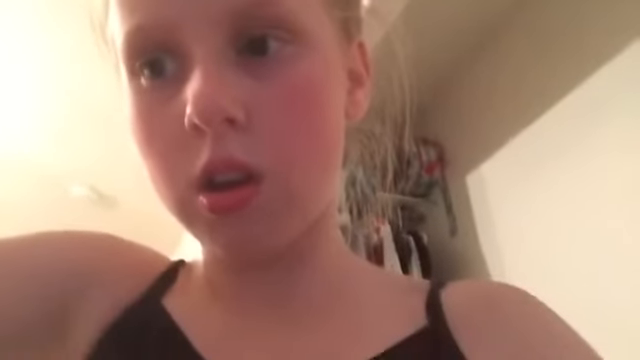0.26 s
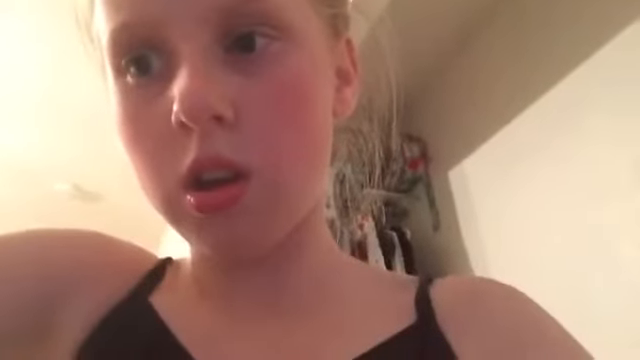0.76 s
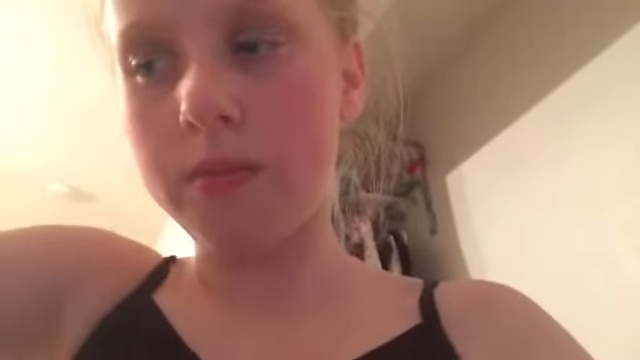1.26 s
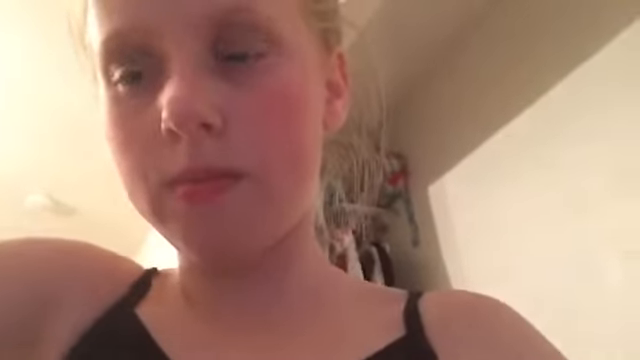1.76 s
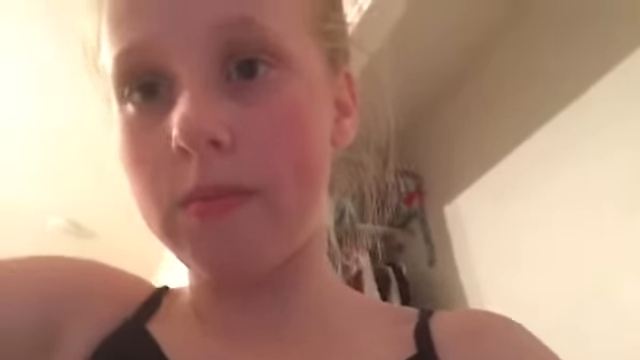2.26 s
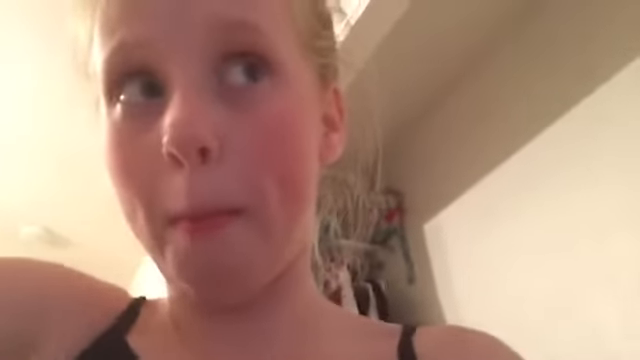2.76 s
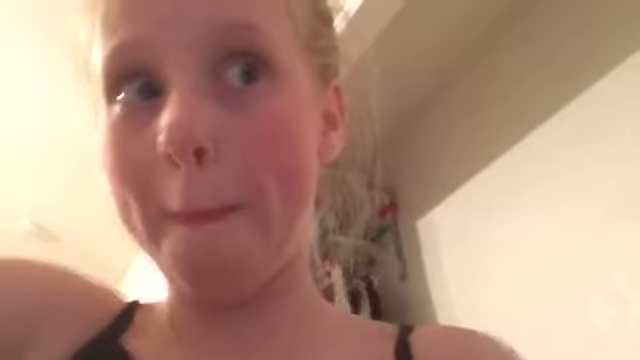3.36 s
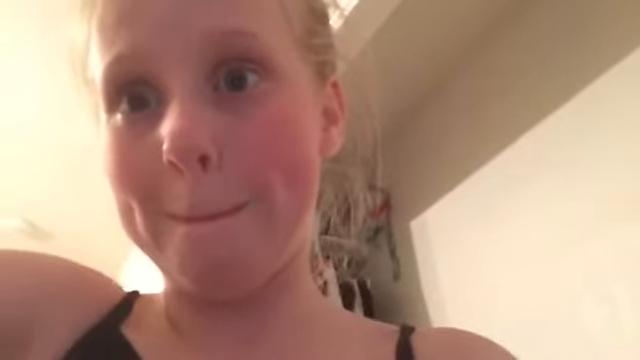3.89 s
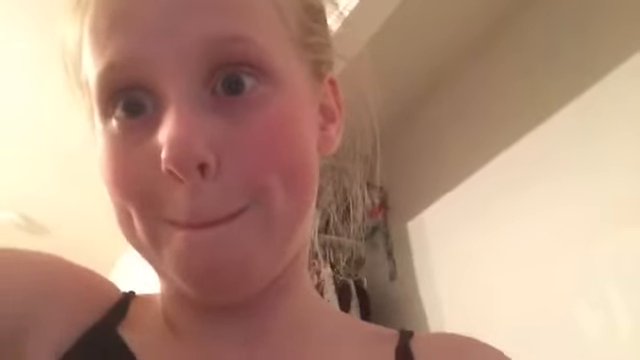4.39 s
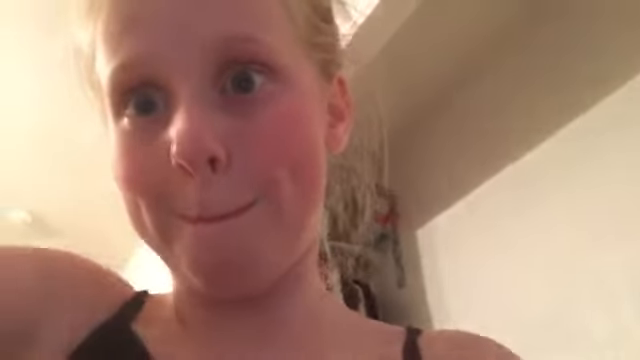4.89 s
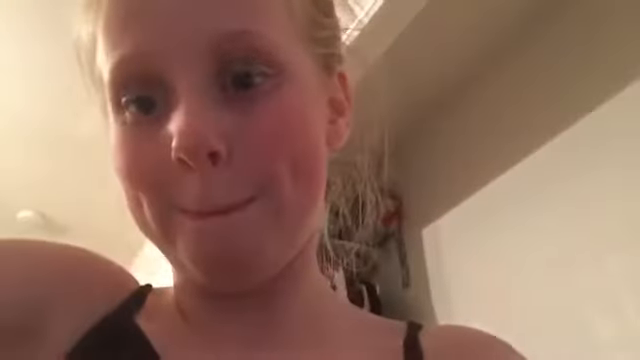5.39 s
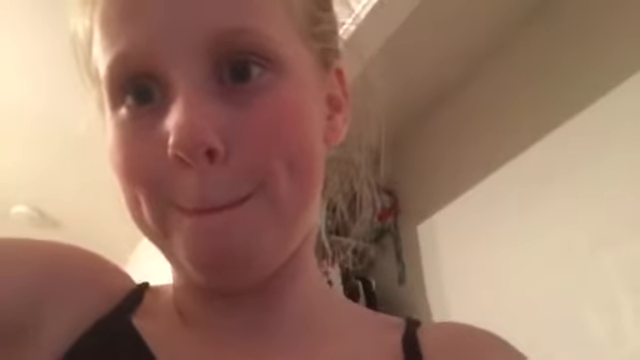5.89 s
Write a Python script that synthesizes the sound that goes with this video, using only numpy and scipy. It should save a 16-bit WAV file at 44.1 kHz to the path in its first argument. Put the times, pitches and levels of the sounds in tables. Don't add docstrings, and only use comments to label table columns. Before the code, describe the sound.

Fingertips drum loosely on an upturned small ceramic bowl, then settle into steady hollow taps with nail ticks and faint skin scrapes, very close.

```python
import sys
import numpy as np
from scipy import signal
from scipy.fft import rfft, irfft
from scipy.io import wavfile
from scipy.ndimage import uniform_filter1d

SR = 44100
rng = np.random.default_rng(int(sys.argv[2]) if len(sys.argv) > 2 else 0)


def invert_db(level):
    return 10 ** (np.asarray(level, dtype=float) / 20)


def int16_out(signal):
    q = np.round(np.clip(np.atleast_2d(signal).T, -1, 1) * 32767)
    wavfile.write(sys.argv[1], SR, q.astype(np.int16))


N = 270774
T = np.arange(N) / SR

# (frequency [Hz], level [dB], T60 [s])
BOWL_MODES = [(146, -14, 0.3), (214.4, -24.5, 0.028), (256.4, 13.5, 0.076), (363, 2, 0.027),
              (486.3, 8, 0.094), (498, -1, 0.071), (604, -0.5, 0.013), (746, -3.5, 0.092),
              (755, -25.5, 0.066)]
# (frequency [Hz], level [dB], T60 [s])
GLAZE_MODES = [(1588, -17, 0.066), (2440, 9, 0.02), (3040, -4, 0.075), (3132, 13, 0.047),
               (3402, 26.5, 0.014), (4123, 15, 0.044), (4530, -2.5, 0.06), (5200, 1, 0.045),
               (5740, -19, .015)]
# (frequency [Hz], density [dB per Hz])
SCRATCH_COLOUR = [(530, -33), (900, -15.5), (967, -44.5), (1160, -6), (1620, -3.5), (1960, -6), (2840, 1.5),
                  (3480, 2.5), (6330, -8.5), (7310, -17.5), (15700, -53)]
# (frequency [Hz], density [dB per Hz])
TICK_COLOUR = [(530, -25), (900, -19.5), (1100, -19.5), (3130, -5.5), (4120, -10), (5110, -8.5),
               (5820, -15), (6410, -12), (7140, -20.5), (8050, -21.5), (15700, -38.5)]
# (frequency [Hz], density [dB per Hz])
HUM_COLOUR = [(15, -69.5), (25, -47), (65, -37), (119, -6), (242, 0.5), (339, -4), (402, -15), (469, -5),
              (806, -14), (1000, -23), (1300, -65), (2200, -120)]
# (lag [s], level [dB])
NEAR_ECHOES = [(.0065, -9.5), (.0088, -15)]
# (frequency [Hz], density [dB per Hz])
HISS_COLOUR = [(200, -28.5), (600, -2), (1000, -13), (1600, -11.5), (3000, 0.5), (6000, -8), (9000, -8),
               (15500, -13.5)]
# (frequency [Hz], level [dB])
THUD_COLOUR = [(30, -37), (110, -0.5), (200, 6), (300, 3), (840, 7.5), (960, -13), (2000, -34.5),
               (16000, -59)]
# (time [s], thud peak [dB], tick [dB], rebound [dB])
ROLLS = [(.002, -36.5, -39.5, -1.5), (.142, -21, -35.5, -5.5), (.24, -35, -45, -0.5),
         (0.3426, -31, -31.5, -3), (0.3537, -39.5, -41.5, -8.5), (.406, -38, -48.5, 1.5),
         (.422, -42, -44.5, 0), (0.5553, -34.5, -43.5, -2), (.568, -33, -46, -7.5), (.577, -30.5, -55, -5),
         (0.591, -29, -57.5, -13.5), (.652, -39.5, -44.5, -10.5), (0.75, -41.5, -50.5, 10),
         (0.763, -32, -53, -17), (.778, -30.5, -54, -15.5), (.793, -35, -51, -10.5), (.844, -34, -48, -1.1),
         (0.988, -35.5, -47, 6), (1, -30, -54.5, 10.5), (1.013, -34, -55.5, 11.5),
         (1.274, -48.5, -51.5, -6)]
# (time [s], thud peak [dB], tick [dB], thud pitch [Hz])
BEATS = [(1.456, -27.5, -38.5, 377), (1.66, -33, -44.5, 364), (1.83, -30.5, -41, 397),
         (1.959, -42.5, -62, 357), (1.976, -39, -50.5, 360), (2.158, -33.5, -47.5, 330),
         (2.346, -30.5, -41.5, 363), (2.518, -26, -42.5, 397), (2.689, -31.5, -41.5, 382),
         (2.847, -35, -40.5, 335), (3.035, -30, -40.5, 386), (3.212, -30.5, -41, 415),
         (3.377, -31.5, -42.5, 394), (3.542, -29.5, -42, 410), (3.547, -32, -51, 420),
         (3.714, -27.5, -40.5, 373), (4.012, -32, -46, 376), (4.19, -35.5, -48, 367),
         (4.349, -34.5, -45, 346), (4.541, -28.5, -47.5, 350), (4.698, -35.5, -50.5, 343),
         (4.883, -34.5, -47, 348), (5.186, -35.5, -49.5, 359), (5.373, -29.5, -42.5, 359),
         (5.555, -26.5, -39, 362), (5.739, -27, -38.5, 400), (5.912, -29.5, -40, 368)]
# (start [s], length [s], scratch [dB], rumble [dB])
SCRAPES = [(0, 0.036, -46, -46), (0.067, 0.074, -61, -55), (0.239, 0.012, -50.5, -52),
           (.319, 0.024, -55.5, -61.5), (.348, 0.066, -65, -54.5), (.418, .03, -48.5, -49.5),
           (0.556, 0.049, -41.5, -49.5), (0.618, 0.066, -48, -53.5), (0.709, 0.04, -50, -54),
           (0.752, 0.048, -40, -51), (0.839, 0.042, -49.5, -49.5), (0.918, 0.058, -57.5, -55),
           (.982, .044, -40.5, -57), (1.054, 0.022, -56, -54.5), (1.132, 0.036, -63.5, -62.5),
           (1.297, 0.043, -58, -65), (1.878, .025, -52, -56.5), (1.954, 0.033, -62, -45),
           (2.545, 0.091, -66, -77), (2.745, 0.057, -59.5, -65), (3.036, 0.058, -52.5, -58),
           (3.618, 0.099, -70.5, -75.5), (4.333, 0.11, -64.5, -57.5), (4.778, 0.07, -64, -66.5),
           (4.892, 0.082, -64, -75), (5.101, 0.051, -74.5, -71), (5.237, 0.024, -66, -67.5),
           (5.451, 0.056, -67, -72.5), (5.784, 0.03, -66.5, -74), (6.122, 0.051, -67, -66)]
# (start [s], length [s], hollow [dB], rumble [dB])
SHIFTS = [(0, 0.076, -64, -64), (0.05, 0.11, -65, -71), (0.122, 0.17, -62.5, -57),
          (0.238, 0.012, -46.5, -71), (0.33, 0.053, -64, -74.5), (0.406, 0.026, -59, -74.5),
          (0.469, 0.0099, -65, -85), (.751, 0.088, -57.5, -64), (1.133, 0.036, -63.5, -80),
          (1.235, 0.035, -63.5, -69), (1.268, 0.03, -55, -76), (1.731, 0.024, -76, -86),
          (1.943, 0.074, -68, -78), (2.032, 0.045, -67.5, -71), (2.453, 0.2, -64, -81),
          (2.839, 0.08, -71.5, -55.5), (2.947, 0.019, -72.5, -68.5), (3.044, 0.081, -59.5, -71),
          (3.106, 0.22, -69.5, -92), (3.626, 0.056, -71.5, -76), (3.899, 0.025, -73, -66),
          (3.973, 0.034, -73.5, -72.5), (4.04, 0.058, -61, -60), (4.221, 0.049, -75.5, -67),
          (4.72, 0.029, -77, -71)]
# (start [s], length [s], fizz [dB])
BRUSHES = [
    (0.336, 0.019, -66),
    (1.274, 0.065, -75),
    (2.749, .05, -78.5),
    (3.036, 0.085, -65),
    (4.348, .09, -88),
    (4.89, 0.084, -77),
    (5.598, 0.072, -80),
    (5.742, 0.044, -71.5),
    (5.546, 0.036, -68.5),
    (5.918, .05, -78.5),
]

ROOM_T60_LOW_S, ROOM_T60_HIGH_S, ROOM_LOW_DB, ROOM_HIGH_DB = 0.24, 0.33, -13, -12.5
WALL_S = 0.009
REBOUND_S, PAD_S, CRACK_S = 0.0118, 0.0047, 0.0035
ROLL_HZ, USUAL_THUD_DB, USUAL_TICK_DB = 407, -28.5, -47
REBOUND_DB, REBOUND_PER_DB = -4, -0.38
TILT_DB, TILT_PER_DB = -2, 0.25
SCRAPE_FIZZ_DB, SCRAPE_HOLLOW_DB = -23, -27
LIFT_LAG_S, LIFT_S, LIFT_SCRATCH_DB, LIFT_FIZZ_DB = 0.0048, 0.09, -31.5, -41
HUM_DB, HUM_PER_DB, HUM_FOLLOW_S, HUM_MIDDLE_DB = -75.5, 0.7369, 0.076, -53.5
JOLT_HZ, JOLT_DB, JOLT_S = 40.5, -46.5, 0.012
HISS_DB, GATE_OVER_DB, GATE_DEPTH_DB = -68, 3, -24.5


def unit(x):
    return x / np.sqrt(np.mean(x ** 2))


def unit_energy(x):
    return x / np.linalg.norm(x)


def colour(x, points):
    hz, db = np.transpose(points)
    f = np.maximum(np.arange(len(x) // 2 + 1) * SR / len(x), 1)
    return irfft(rfft(x) * invert_db(np.interp(np.log(f), np.log(hz), db)), len(x))


def coloured_noise(points):
    return unit(colour(rng.standard_normal(N), points))


def resonate(x, response):
    return signal.fftconvolve(x, response)[:N]


def ring(modes, t, weight=1, stretch=1):
    hz, db, t60 = np.transpose(modes)[:, :, None]
    fading = weight * invert_db(db - 60 * t / t60)
    return (fading * np.sin(2 * np.pi * hz * stretch * t)).sum(axis=0)


def add(out, s, x):
    i = int(s * SR)
    out[i:i + len(x)] += x[:N - i]


def blows():
    every = [(s, db, tick_db, ROLL_HZ, rebound_db) for s, db, tick_db, rebound_db in ROLLS]
    for s, db, tick_db, hz in BEATS:
        rebound_db = REBOUND_DB + REBOUND_PER_DB * (tick_db - USUAL_TICK_DB)
        every.append((s, db, tick_db, hz, rebound_db))
    return every


def swell(layer_dbs, s, length):
    samples = max(length, 0.01) * SR
    u = np.arange(int(samples)) / samples
    for layer, db in layer_dbs:
        add(layer, s, invert_db(db) * np.minimum(u / 0.22, 1) * np.minimum((1 - u) / 0.41, 1))


def contact():
    scratch, rumble, hollow, fizz = layers = np.zeros((4, N))
    for s, length, db, rumble_db in SCRAPES:
        swell([(scratch, db), (rumble, rumble_db), (hollow, db + SCRAPE_HOLLOW_DB),
               (fizz, db + SCRAPE_FIZZ_DB)], s, length)
    for s, length, db, rumble_db in SHIFTS:
        swell([(hollow, db), (rumble, rumble_db)], s, length)
    for s, length, db in BRUSHES:
        swell([(fizz, db)], s, length)
    for s, _, tick_db, *_ in blows():
        swell([(scratch, tick_db + LIFT_SCRATCH_DB), (fizz, tick_db + LIFT_FIZZ_DB)], s + LIFT_LAG_S, LIFT_S)
    return layers


def drags():
    scratch, rumble, hollow, fizz = contact()
    uneven_db = np.minimum(3.0 * rng.exponential(size=(3, N // 64 + 1)), 9)
    slips = rng.standard_normal((3, N)) * invert_db(uneven_db).repeat(64, axis=1)[:, :N]
    t = T[:SR // 8]
    glaze = unit_energy(ring(GLAZE_MODES, t))
    bowl = unit_energy(ring(BOWL_MODES, t))
    hand = unit_energy(ring([(1599, -1, 0.029), (1325, -8.5, 0.029), (1850, -11.0, 0.02)], t))
    bright = unit(colour(slips[0], SCRATCH_COLOUR)) * scratch
    bright += unit(colour(slips[1], [(4000, -28.5), (7500, -3.0), (11000, -9), (15500, -14)])) * fizz
    bright += 0.3 * resonate(unit(slips[0]) * scratch, glaze)
    bright += resonate(unit(slips[2]) * hollow, hand)
    dull = resonate(unit(slips[1]) * rumble, bowl)
    return colour(dull, [(100, -18), (280, 1.0)]), bright


def air(near):
    t = T[:SR // 2]
    memory = np.exp(-t / HUM_FOLLOW_S) / (HUM_FOLLOW_S * SR)
    near_db = 10 * np.log10(np.maximum(resonate(near ** 2, memory), 1e-10))
    hum = coloured_noise(HUM_COLOUR) * invert_db(HUM_DB + HUM_PER_DB * (near_db - HUM_MIDDLE_DB))
    drone = coloured_noise([(25, -22.0), (90, -18.5), (135, 7.5), (220, -3.0), (400, -44.5)])
    return hum + invert_db(-76) * drone


def taps():
    thuds, ticks, t = np.zeros(N), np.zeros(N), T[:SR // 6]
    grit = coloured_noise(TICK_COLOUR)
    modes = len(BOWL_MODES)
    chance = rng.standard_normal((len(blows()), modes + len(GLAZE_MODES) + 1))
    push = np.exp(-((t - PAD_S) / np.where(t < PAD_S, 0.0015, 0.0024)) ** 2)
    crack_shape = np.exp(-t / CRACK_S) + invert_db(-13.0) * np.exp(-t / 0.019)
    crack_shape *= np.minimum(t / 0.0024, 1)
    for (s, db, tick_db, hz, rebound_db), c in zip(blows(), chance):
        knock = -np.cos(2 * np.pi * hz * (t - PAD_S)) * push
        rim = ring([(801, -21.5, 0.045), (613, -20.5, 0.059)], t, invert_db(2.5 * c[3:5, None]), 1 + 0.012 * c[5])
        rim *= np.clip(t / 0.003, 0, 1)
        body = ring(BOWL_MODES, t, c[:modes, None], 1 + 0.045 * c[-1])
        body *= np.clip(t / 0.012, 0, 1) ** 2
        add(thuds, s, invert_db(db) * (knock + rim + invert_db(-19.5) * body))
        for lag_s, echo_db in NEAR_ECHOES:
            add(thuds, s + lag_s + 0.00038 * c[1], invert_db(db + echo_db + 0.47 * c[2]) * knock)

        crack = grit[int(s * SR) // 2:][:len(t)] * crack_shape
        tick = crack + 0.045 * ring(GLAZE_MODES, t, c[modes:-1, None], 1 + 0.0079 * c[-1])
        tilt_db = TILT_DB + TILT_PER_DB * (db - USUAL_THUD_DB)
        tick = colour(tick, [(750, -2 * tilt_db), (3000, 0.025), (12000, 2 * tilt_db)])
        tick *= (1 - t / t[-1]) ** 2
        add(ticks, s + 0.0007, invert_db(tick_db + 4.5) * tick)
        add(ticks, s + REBOUND_S + 0.00037 * c[0], invert_db(tick_db - 0.5 + rebound_db) * tick)
    return thuds, ticks


def jolts():
    out, t = np.zeros(N), T[:SR // 8]
    swing = np.sin(2 * np.pi * JOLT_HZ * t) * (t / JOLT_S) * np.exp(1 - t / JOLT_S)
    for s, db, *_ in blows():
        add(out, s, invert_db(db + JOLT_DB + 1.5 * rng.standard_normal()) * swing)
    return out


def room(x, t60, db):
    t = T[:SR // 2]
    tail = rng.standard_normal(len(t)) * invert_db(-60 * t / t60) * np.clip((t - WALL_S) / 0.004, 0, 1)
    return x + invert_db(db) * resonate(x, unit_energy(tail))


def gate(x, hiss):
    frame = dict(fs=SR, nperseg=2048, noverlap=1536)
    z = signal.stft(x + hiss, **frame)[2]
    usual = np.mean(np.abs(signal.stft(hiss, **frame)[2]) ** 2, axis=-1, keepdims=True)
    power = uniform_filter1d(np.abs(z) ** 2, size=19, axis=-2)
    gain = np.clip(1 - invert_db(2 * GATE_OVER_DB) * usual / (power + 1e-18), invert_db(GATE_DEPTH_DB), 1)
    return signal.istft(z * gain, **frame)[1][..., :N]


def scene():
    rumble, scratch = drags()
    thuds, ticks = taps()
    low = colour(room(thuds + rumble, ROOM_T60_LOW_S, ROOM_LOW_DB), THUD_COLOUR)
    high = room(ticks + scratch, ROOM_T60_HIGH_S, ROOM_HIGH_DB)
    return (low + high + jolts() + air(low + high))[None]


def top_cut(x):
    return signal.sosfilt(signal.butter(12, 15880, fs=SR, output="sos"), x)


def record(dry):
    thin = signal.sosfilt(signal.butter(2, 50, "high", fs=SR, output="sos"), dry)
    hiss = invert_db(HISS_DB) * coloured_noise(HISS_COLOUR)
    return top_cut(gate(thin, hiss))


dry = scene()
out = record(dry)
int16_out(out)
```